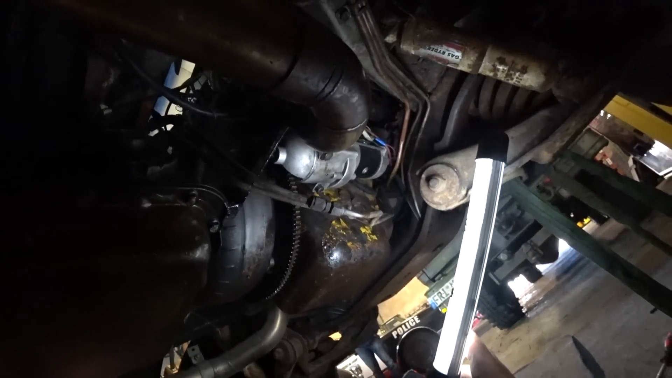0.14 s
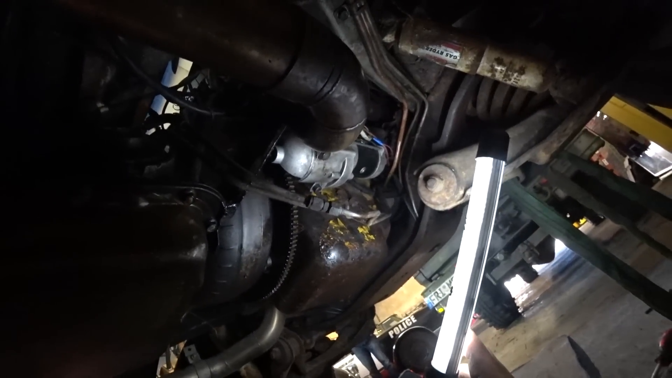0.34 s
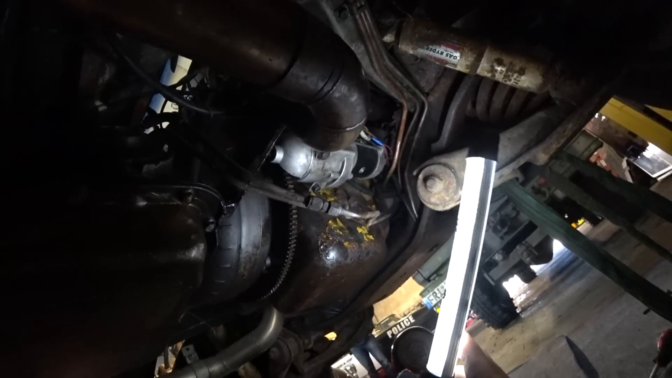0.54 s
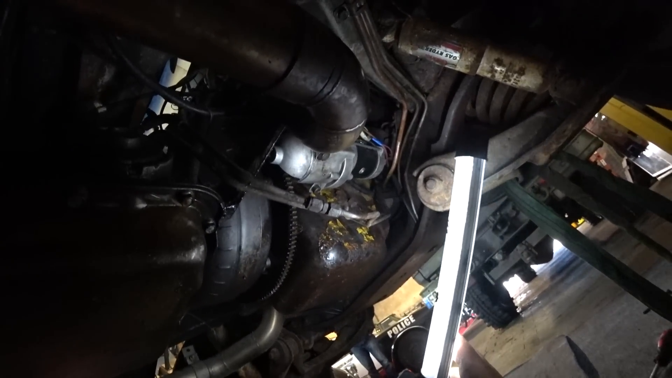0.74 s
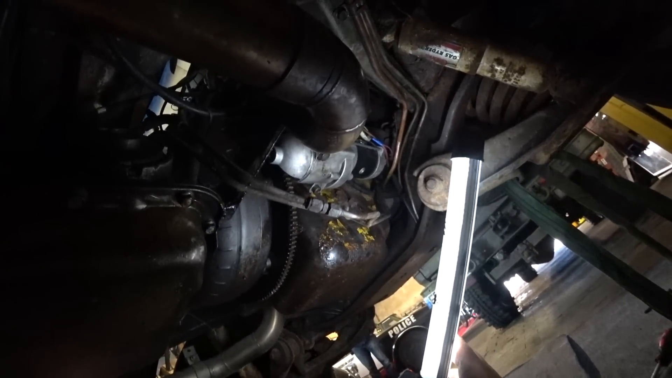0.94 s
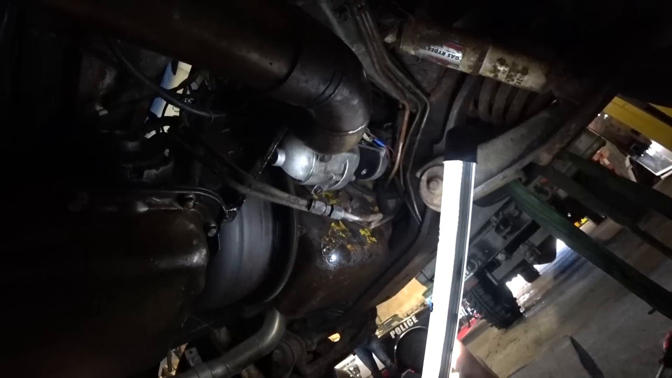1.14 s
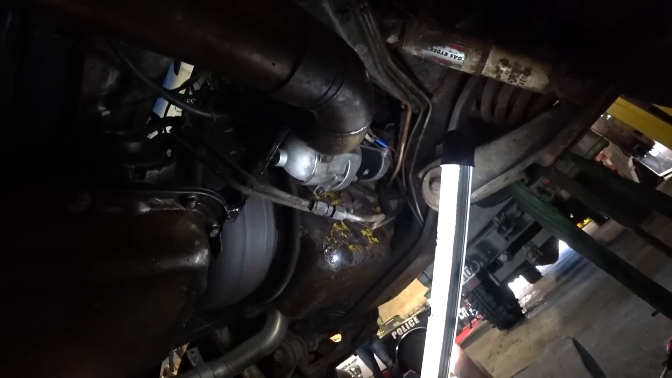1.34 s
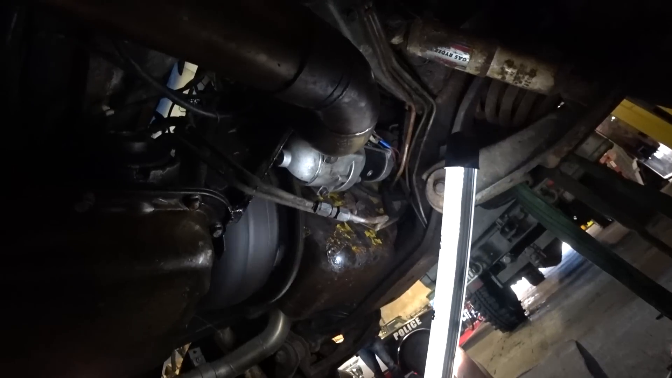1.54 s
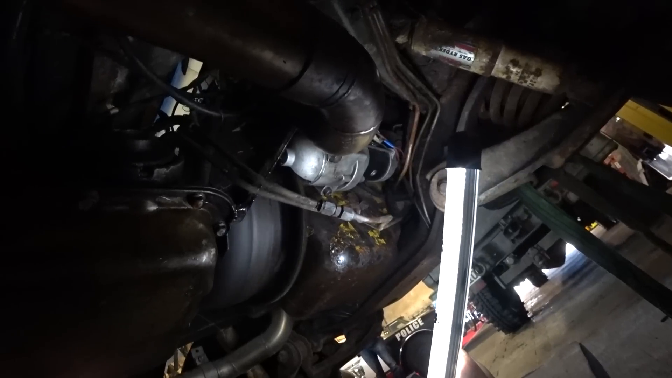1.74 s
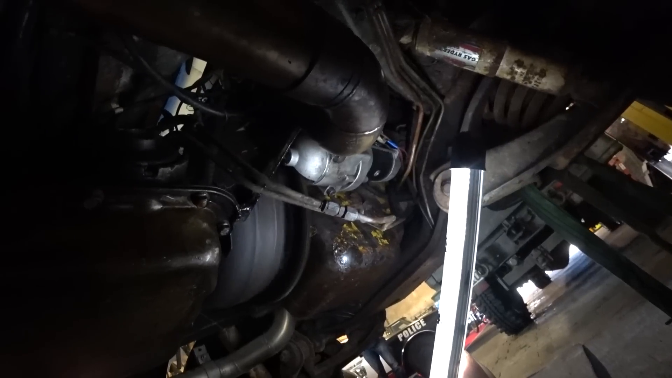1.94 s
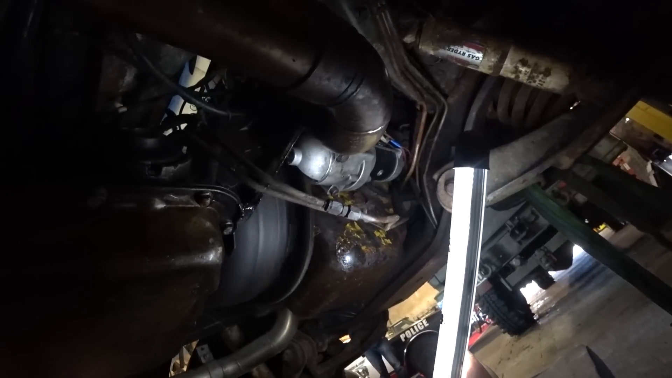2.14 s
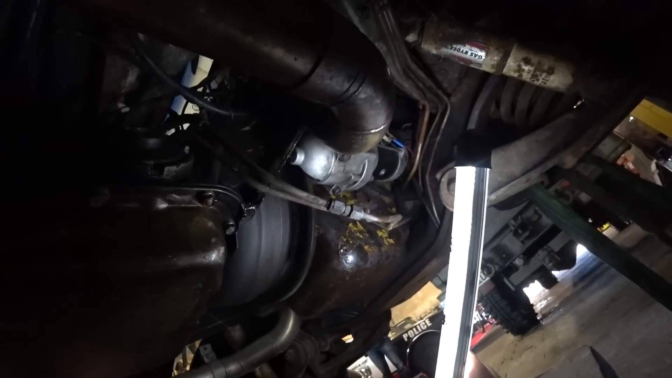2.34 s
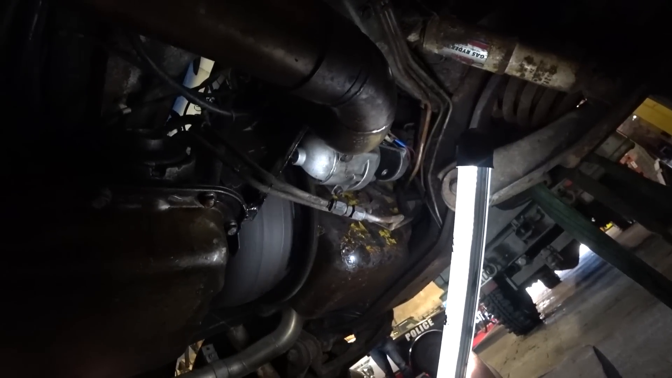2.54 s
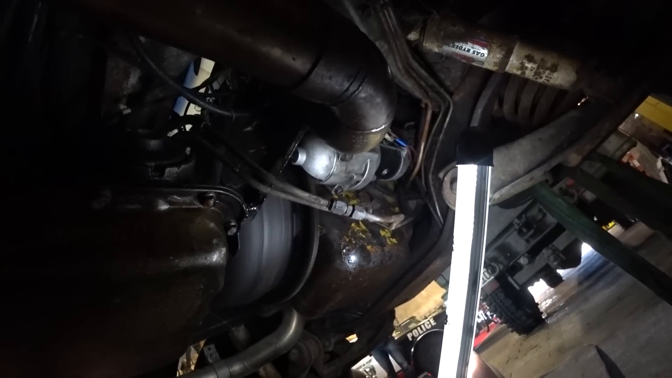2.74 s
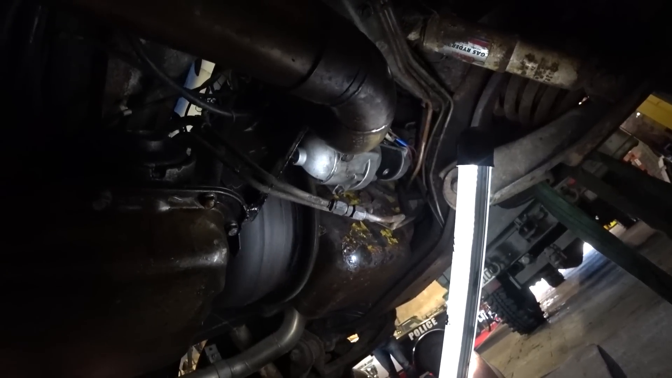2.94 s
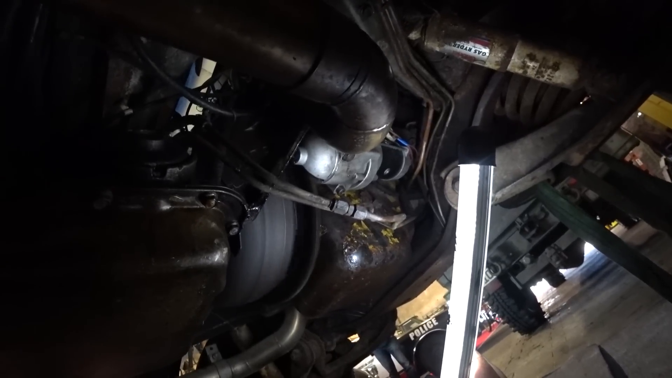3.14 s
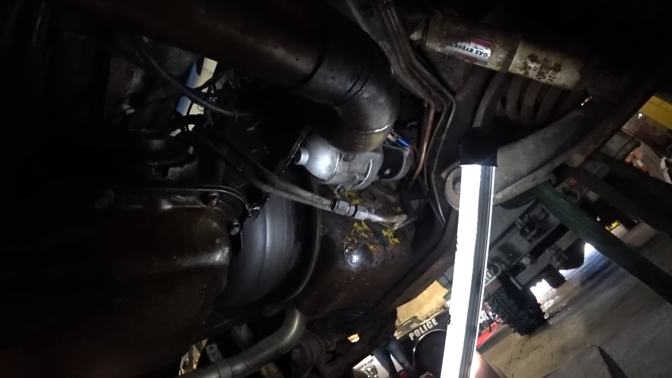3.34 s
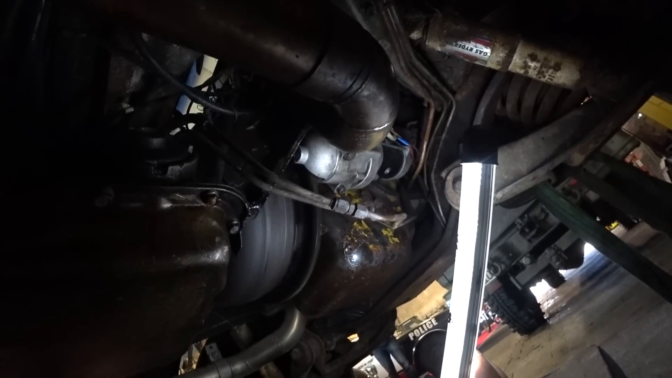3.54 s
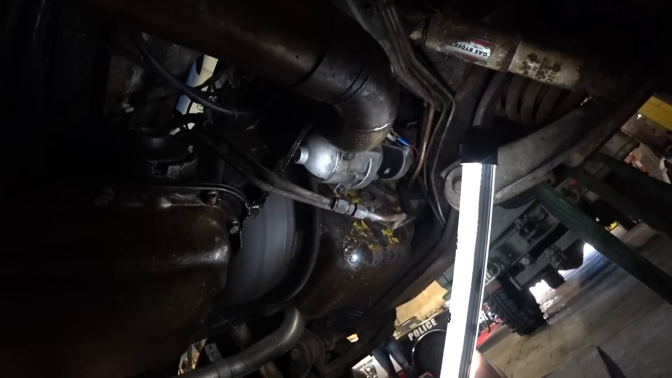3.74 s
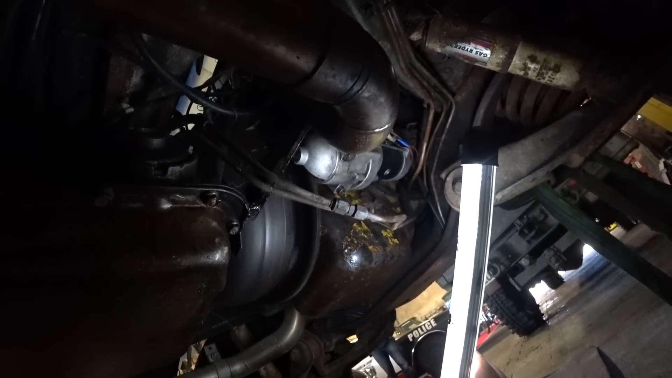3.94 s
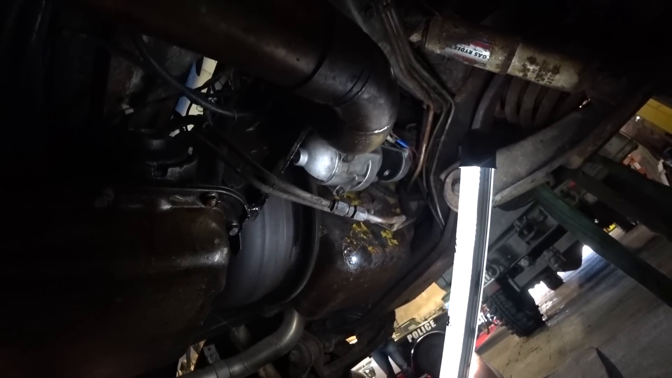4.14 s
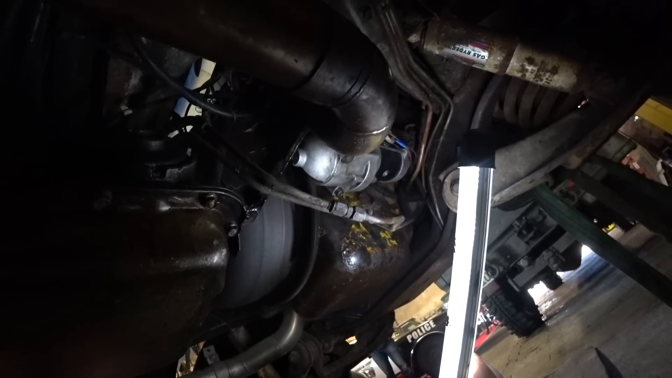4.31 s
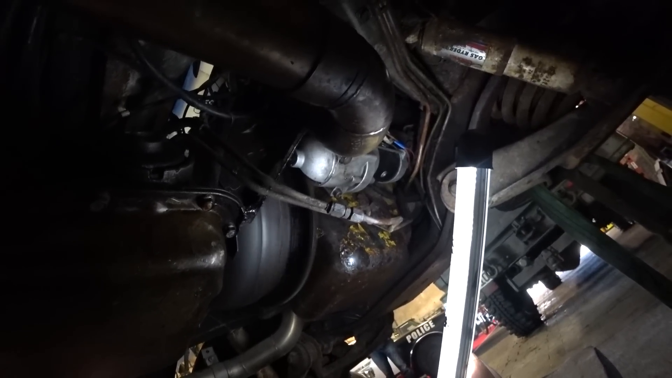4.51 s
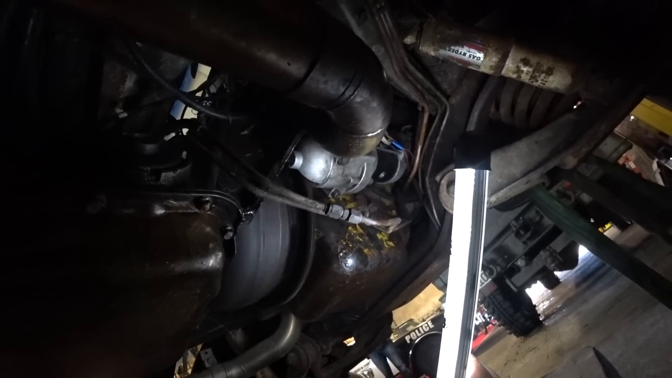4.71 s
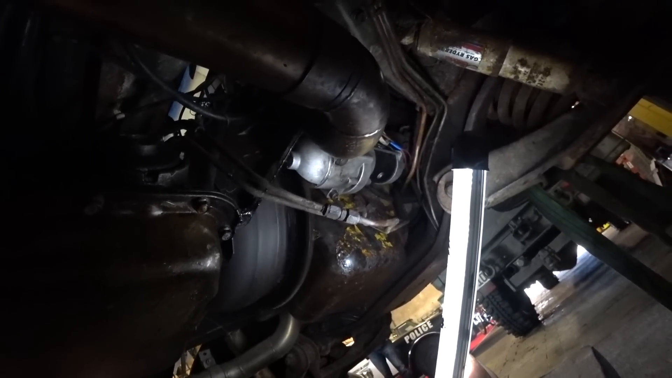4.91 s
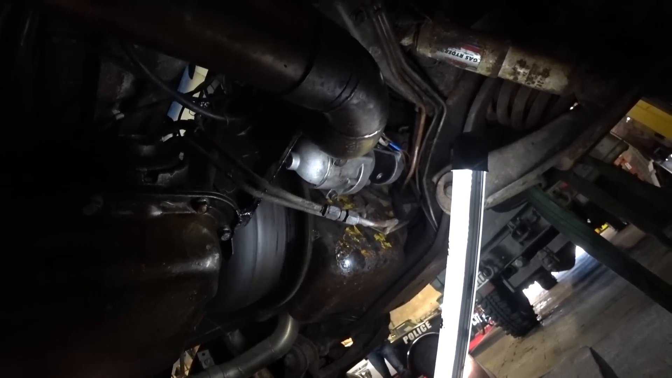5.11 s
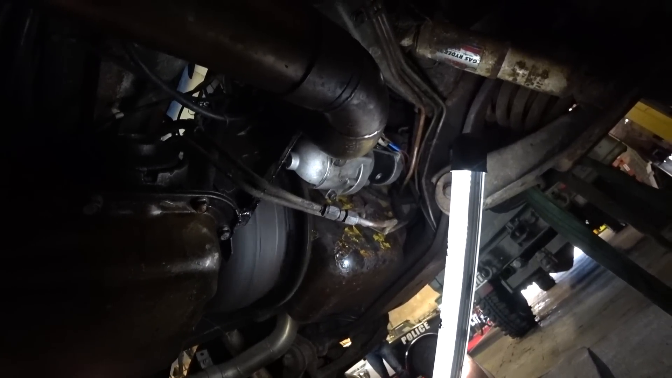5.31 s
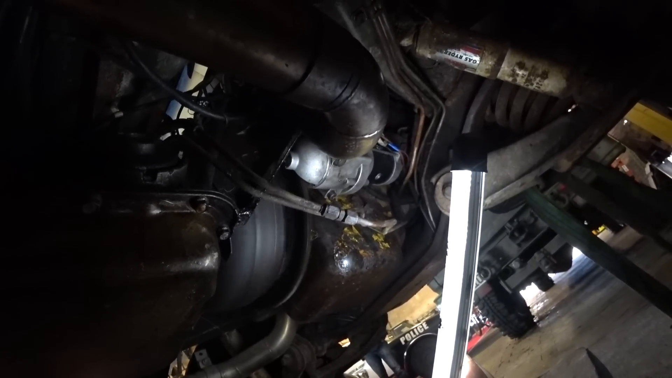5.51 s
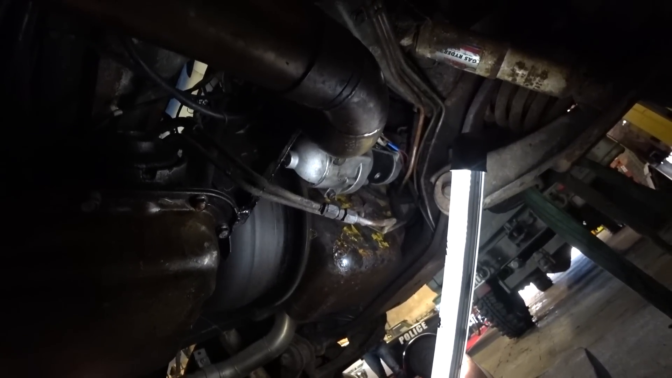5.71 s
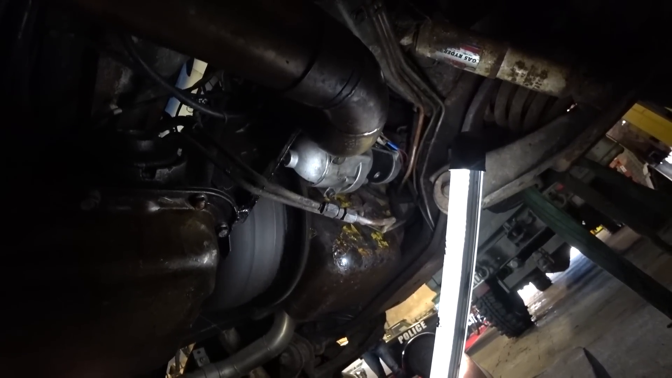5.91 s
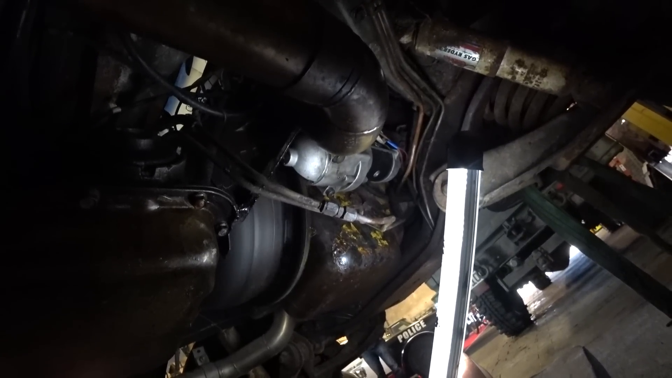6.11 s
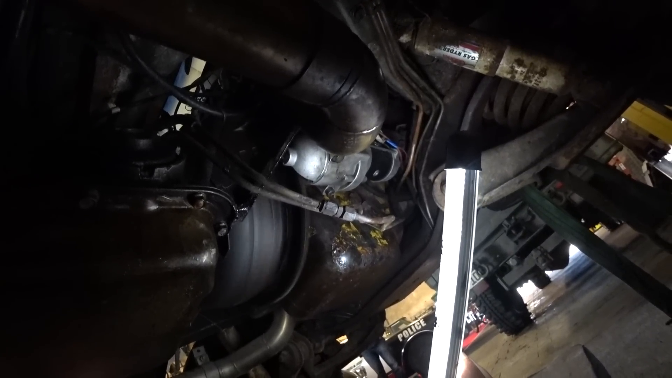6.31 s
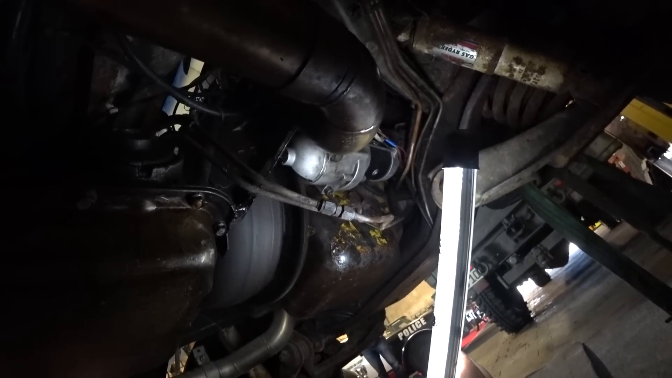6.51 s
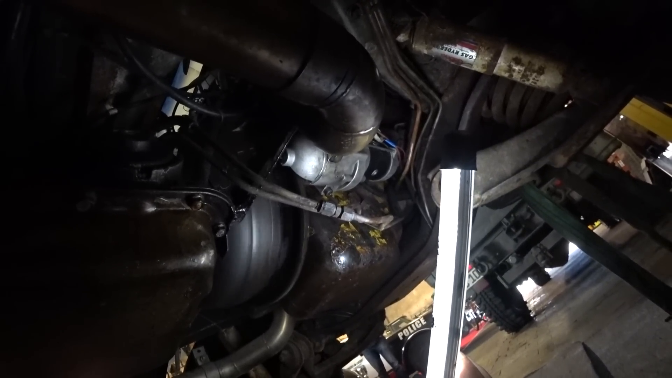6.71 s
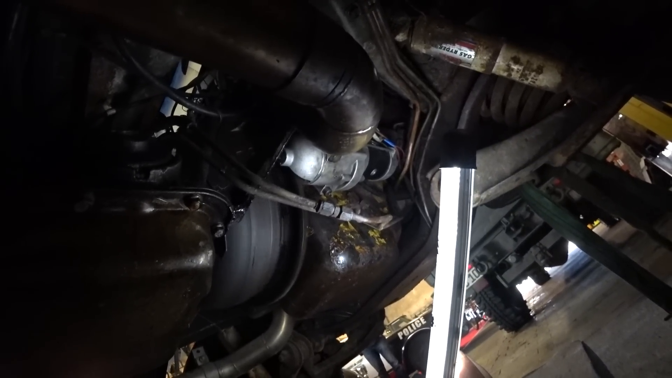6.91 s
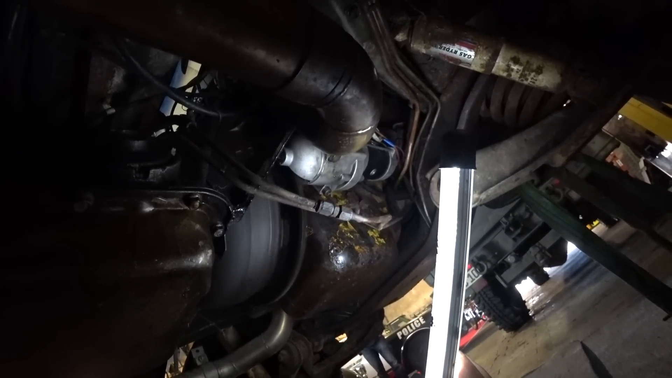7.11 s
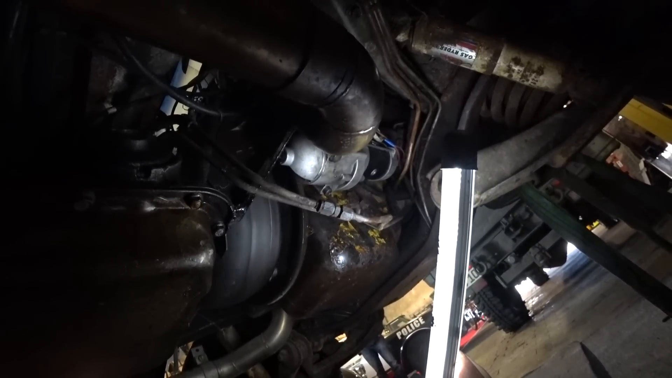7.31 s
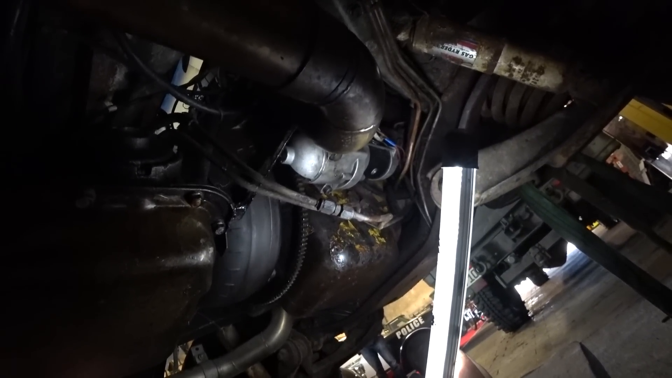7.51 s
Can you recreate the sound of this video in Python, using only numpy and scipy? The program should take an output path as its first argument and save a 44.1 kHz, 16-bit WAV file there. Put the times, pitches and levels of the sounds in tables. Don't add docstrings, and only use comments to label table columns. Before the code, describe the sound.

Close beside a diesel engine in a quiet workshop, faint hiss, a distant scrape and small metal ticks come first. A relay clicks, a solenoid clunks hard, and the starter grinds with bright, ringing gear clatter, pulsing as compressions slow it. The engine never fires. Power cuts abruptly, leaving loose clacks, a thin hum and a last solenoid snap.

```python
import sys
import numpy as np
from scipy import signal
from scipy.fft import rfft, irfft, next_fast_len
from scipy.io import wavfile
from scipy.ndimage import uniform_filter1d

SR = 44100
rng = np.random.default_rng(int(sys.argv[2]) if len(sys.argv) > 2 else 0)


def rack_gain(trim_db):
    fader = np.asarray(trim_db, float)
    return 10 ** (fader / 20)


def inscribe(sig):
    pcm = np.round(np.clip(np.atleast_2d(sig).T, -1, 1) * 32767)
    wavfile.write(sys.argv[1], SR, pcm.astype(np.int16))


N = 337806
ENGAGE_S, CUT_S = 1.04, 7.235


def evened(x):
    return x / np.sqrt(np.mean(x ** 2) + 1e-20)


def read(points, hz):
    f, value = np.transpose(points)
    return np.interp(np.log(hz + 1), np.log(f + 1), value)


def along(rows):
    s, *columns = np.transpose(rows)
    return [np.interp(np.arange(N) / SR, s, c) for c in columns]


def shape(x, db_at):
    size = next_fast_len(N + 4096)
    gain = rack_gain(db_at(np.fft.rfftfreq(size, 1 / SR)))
    return irfft(rfft(x, size) * gain, size)[..., :N]


def band(x, lo_hz, hi_hz):
    sos = signal.butter(4, [lo_hz, hi_hz], "band", fs=SR, output="sos")
    return evened(signal.sosfilt(sos, x))


def resonate(x, hz, width):
    r = np.exp(-np.pi * width / SR)
    return evened(signal.lfilter([1, 0, -1], [1, -2 * r * np.cos(2 * np.pi * hz / SR), r * r], x))


def slow(hz):
    sos = signal.butter(2, hz, fs=SR, output="sos")
    return evened(signal.sosfilt(sos, rng.standard_normal(N)))


def between(start_s, end_s, rise_s, fall_s):
    t = np.arange(N) / SR
    return np.clip((t - start_s) / rise_s, 0, 1) * np.clip((end_s - t) / fall_s, 0, 1)


# pitch in Hz, level in dB per Hz.
ROOM_COLOUR = [(12, -37), (20, -6), (109, -9.5), (128, -9), (154, -15), (547, -23), (930, -21.5),
               (1120, -21), (1800, -26.5), (1950, -23), (2230, -33), (2750, -31), (6090, -37), (7140, -34),
               (11200, -45), (14600, -77), (22000, -120)]
# pitch in Hz, width in Hz, level in dB.
SCRAPE_TONES = [(346, 100, 4.5), (565, 65, 4), (720, 130, 4), (900, 170, -7), (1170, 44, 7.5),
                (1530, 120, -19), (3150, 140, -13)]
# time in seconds, level in dB.
SCRAPE_FADE = [(0.0, -57), (0.01, -53.5), (0.096, -56), (0.112, -53), (0.274, -63.5), (0.292, -76),
               (0.33, -76)]
# pitch in Hz, width in Hz, level in dB.
FAN_WHINE = [(1940, 25, -84.5)]


def shop():
    centre, apart, drag = rng.standard_normal((3, N))
    apart = shape(apart, lambda hz: 1.2 * np.log2(hz / 9000 + .01))
    both = np.array([centre, centre]) + np.outer([1, -1], apart)
    air = evened(shape(both, lambda hz: read(ROOM_COLOUR, hz)))
    scrape = np.zeros(N)
    for hz, width, db in SCRAPE_TONES:
        tone = resonate(resonate(drag, hz, 1.3 * width), hz, 2.5 * width)
        scrape += rack_gain(db) * np.sqrt(width) * tone
    dragging = np.arange(N) < SCRAPE_FADE[-1][0] * SR
    scrape = dragging * rack_gain(along(SCRAPE_FADE)[0]) * evened(scrape)
    fan = sum(rack_gain(db) * resonate(centre, hz, width) for hz, width, db in FAN_WHINE)
    return rack_gain(-61) * air + scrape + fan


# start in seconds, peak in dB, pitch in Hz, time to fade by 60 dB in seconds.
METAL_TICKS = [
    (.387, -47, 5000, 0.049),
    (.387, -51, 7750, 0.086),
    (.388, -46, 9600, 0.05),
    (.552, -58, 2850, .03),
    (.63, -51, 4940, 0.042),
    (.631, -62, 7880, .05),
    (.857, -42, 5000, 0.045),
    (.858, -58, 9100, .06),
    (.746, -41, 3160, .006),
    (7.452, -48, 4100, .05),
]


def ticks():
    out, t = np.zeros(N), np.arange(3000) / SR
    for s, db, hz, t60 in METAL_TICKS:
        click = 0.19 * np.diff(rng.standard_normal(len(t) + 1)) * np.exp(-t / .003)
        ping = resonate(rng.standard_normal(len(t)), hz, 90.) * rack_gain(-60 * t / t60)
        ping *= 0.62 * (1 - np.exp(-t / .002))
        out[round(s * SR):][:len(t)] += rack_gain(db) * (ping + click)
    return out


def clacks(rows, modes, rise_s, thud):
    out, t = np.zeros(N), np.arange(9000) / SR
    for s, db, lo_hz, hi_hz, t60, ring_db in rows:
        noise = rng.standard_normal(len(t))
        snap = 0.29 * np.diff(noise, prepend=0) * np.exp(-t / 0.019)
        crack = (band(noise, lo_hz, min(hi_hz, 11000)) + snap) * rack_gain(-60 * (t / t60) ** 1.16)
        ring = sum(rack_gain(d - 60 * t / fade) * resonate(noise, hz, 98.0) for hz, d, fade in modes)
        body = thud * band(noise, 208, 1020) * rack_gain(-60 * t / 0.34)
        blow = (crack + body + rack_gain(ring_db) * ring) * (1 - np.exp(-t / rise_s))
        part = out[round(s * SR):][:len(t)]
        part += (rack_gain(db) * blow / abs(blow).max())[:len(part)]
    return out


# start in seconds, peak in dB, low edge in Hz, high edge in Hz,
# time to fade by 60 dB in seconds, share of ringing in dB.
ENGAGE_CLACKS = [
    (.792, -14.5, 990, 7060, 0.066, -5),
    (1.02, -5.5, 530, 9700, 0.058, -22),
    (1.047, -15, 630, 1110, 0.094, -32),
]
# pitch in Hz, level in dB, time to fade by 60 dB in seconds.
RELAY_RING = [(1150, 2, 0.15), (1640, -11, 0.13), (2310, -7, 0.16), (2900, 8, 0.058), (3050, -15, 0.35),
              (3350, -5, .07), (4560, 5.5, 0.042), (5550, 0, 0.04)]


def relay_and_solenoid():
    return clacks(ENGAGE_CLACKS, RELAY_RING, rise_s=0.0023, thud=0.11)


# start in seconds, tone level in dB,
# pitch in Hz, length in seconds, rumble in dB relative to the tone.
CASE_GROANS = [
    (1.026, -27.5, 530, 0.044, 2),
    (1.619, -40.5, 530, 0.095, 2),
    (2.389, -45, 523, 0.057, 8),
    (2.749, -35, 525, 0.094, -6),
    (3.892, -29, 530, 0.1, -3),
    (4.671, -42, 530, 0.071, -4),
    (5.017, -33, 552, 0.095, 0),
    (5.799, -49, 530, 0.064, 10.5),
    (6.129, -31, 530, 0.099, -1),
    (7.193, -39.5, 530, 0.071, 9.5),
]


def groans():
    out, rumble = np.zeros(N), band(rng.standard_normal(N), 500, 1680)
    for s, db, hz, length, rumble_db in CASE_GROANS:
        t = np.arange(round(length * SR)) / SR
        part = slice(round(s * SR), round(s * SR) + len(t))
        tone = np.sqrt(2) * np.sin(2 * np.pi * hz * t)
        swell = np.sin(np.pi * t / length) ** 1.66
        out[part] += rack_gain(db) * swell * (tone + rack_gain(rumble_db) * rumble[part])
    return out


# start in seconds, pace of the starter (1 = full), extra stall as a share.
ENGINE_CYCLES = [
    (.55, 1.05, .1),
    (1.631, .98, .09),
    (2.785, .98, .02),
    (3.925, .975, .01),
    (5.059, 1.005, -.02),
    (6.185, 1.0, 0),
    (7.31, 1.01, 0),
]


def cycle_place():
    s = np.transpose(ENGINE_CYCLES)[0]
    return np.interp(np.arange(N) / SR, s, np.arange(len(s))) % 1


# place as a share of the cycle, tooth rate in Hz.
STROKE_RATES = [(0, 182), (.092, 253.4), (.186, 260.8), (.252, 216), (.31, 256.1), (.496, 304),
                (.633, 286.4), (.7, 228), (.77, 247), (.84, 215.1), (.905, 236)]


def stroke_rate():
    at, hz = np.transpose(STROKE_RATES)
    return np.interp(cycle_place(), at, hz, period=1)


def strain():
    hz = np.transpose(STROKE_RATES)[1]
    return (hz.max() - stroke_rate()) / np.ptp(hz)


def teeth():
    pace, stall = along(ENGINE_CYCLES)
    since = np.maximum(np.arange(N) / SR - ENGAGE_S, 0)
    spin_up = 1 - .37 * np.exp(-since / .15)
    return stroke_rate() * pace * (1 - stall * strain() ** 3) * spin_up


# pitch in Hz, level in dB per Hz.
HOUSING_COLOUR = [(88, -40), (150, -16), (250, -17), (400, -14.5), (620, -20.5), (1000, -9), (1400, -11),
                  (1900, -6.5), (2600, -2.5), (3300, 1.5), (5200, -3), (6300, -8), (7800, -13),
                  (11200, -10)]
# pitch in Hz,
# width in Hz, boost in dB.
HOUSING_RINGS = [(243, 40, 4.5), (530, 23, 13.5), (700, 140, 14.5), (769, 14, 11), (893, 40, 2.5),
                 (1190, 80, 1.5), (1563, 120, 5.5), (1776, 100, 8.5), (1963, 230, 4.5), (2235, 85, 8.5),
                 (2548, 70, 14), (3000, 50, 6), (3186, 85, 8), (3585, 69, 8), (4160, 97, 7.5),
                 (4583, 107, 10.5), (5225, 410, 5.5), (5590, 240, 6.5), (7014, 85, 8), (8400, 270, 7.5)]


def housing(ring_share, shift):
    hz = np.fft.rfftfreq(8192, 1 / SR)
    peaks = 0
    for f, width, boost in HOUSING_RINGS:
        centre = f * (shift if f > 1300 else 1)
        peaks = peaks + boost / (1 + (2 * (hz - centre) / width) ** 2)
    db = read(HOUSING_COLOUR, hz) + ring_share * peaks
    log_gain = np.log(rack_gain(np.maximum(db, -80)))
    full = np.concatenate([log_gain, log_gain[-2:0:-1]])
    return np.fft.ifft(np.exp(np.conj(signal.hilbert(full)))).real[:4096]


def wheel(blows):
    t = np.arange(900) / SR
    paths = rfft(rng.standard_normal((2, len(t))) * np.exp(-t / 0.0079))
    paths = irfft(paths / abs(paths) ** 0.77, len(t))
    angle = 1.406 * slow(9.16)
    out = np.zeros(N)
    for path, detune, mix in zip(paths, (-0.019, 0.019), (np.cos(angle), np.sin(angle))):
        ring = np.convolve(path / np.linalg.norm(path), housing(1, 1 + detune))
        out += signal.oaconvolve(mix * blows, ring)[:N]
    return out


def clumps(x, db):
    hz, _, z = signal.stft(x, SR, nperseg=256)
    patches = uniform_filter1d(rng.standard_normal(z.T.shape), size=7, axis=0)
    patches = evened(uniform_filter1d(patches, size=4, axis=1))
    depth = db * np.clip(hz / 2500, .7, 1)[:, None]
    return signal.istft(z * rack_gain(depth * patches.T), nperseg=256)[1][:N]


def gear():
    jitter_s, scatter_db, wobble = .00003, 2.5, .009
    speed = uniform_filter1d(teeth(), size=900) * (1 + wobble * slow(25.))
    turns = np.cumsum(speed) / SR
    at = np.flatnonzero(np.diff(np.floor(turns)))
    luck = rng.standard_normal((len(at), 2))
    at = np.clip(at + np.round(jitter_s * SR * luck[:, 0]).astype(int), 0, N)
    blows = np.zeros(N + 1)
    np.add.at(blows, at, rack_gain(scatter_db * luck[:, 1]))
    grinding = (1 + 0.37 * np.cos(2 * np.pi * turns)) * rng.standard_normal(N)
    grinding = shape(grinding, lambda hz: 1.2 * np.log2(np.clip(hz, 150, 4500) / 2000))
    ground = signal.oaconvolve(grinding, housing(0.69, 0.92))[:N]
    return clumps(wheel(evened(blows[:N])) + 0.47 * ground, db=2.0)


def bumps(rows):
    place = cycle_place()
    return sum(db * np.exp(-(((place - at + .5) % 1 - .5) / width) ** 2) for at, width, db in rows)


# place as a share of the cycle, width as a share, top rattle in dB.
TOOTH_SNAPS = [
    (.075, .02, 3),
    (.55, .012, 0.5),
    (.62, .03, 1.5),
    (.962, .015, 2.5),
]
# place as a share of the cycle, width as a share, level in dB.
BLOCK_KICKS = [
    (.21, .04, 6),
    (.49, .03, 6),
    (.68, .03, 7),
    (.97, .035, 9),
]


def starter():
    t, load = np.arange(N) / SR, strain()
    clatter_db = -16.5 - load ** 5.04 - 850 * np.maximum(t - CUT_S, 0)
    low_db = -18.5 + 3 * load + 2.5 * slow(16.0)
    top_cut_db = 246 * np.clip(t - CUT_S + 0.024, 0, .1)
    top_db = -10 - 3 * load + bumps(TOOTH_SNAPS) - top_cut_db
    top_db = top_db + 1.9 * slow(28.0)
    ring = gear()
    ring = ring / np.sqrt(uniform_filter1d(ring ** 2, size=5000) + 1e-12)
    middle = band(ring, 1140, 7480)
    low = rack_gain(low_db) * band(ring, 165, 1682)
    top = rack_gain(top_db) * band(ring, 6560, 10920)
    shudder_db = -64.5 + bumps(BLOCK_KICKS) + 3.2 * slow(12.0)
    shudder = rack_gain(shudder_db) * band(rng.standard_normal(N), 50, 212)
    running = between(ENGAGE_S, 7.29, 0.011, .02)
    return running * (rack_gain(clatter_db) * (middle + low + top) + shudder) + groans()


# pitch in Hz, width in Hz, level in dB.
COAST_TONES = [(400, 14, -65), (765, 8.9, -50.5), (1510, 17, -65)]


def coast():
    noise, since = rng.standard_normal(N), np.arange(N) / SR - CUT_S
    tones = sum(rack_gain(db) * resonate(noise, hz, width) for hz, width, db in COAST_TONES)
    fade = rack_gain(-42 * np.maximum(since, 0))
    return np.clip(since / 0.018, 0, 1) * fade * tones


# time in seconds, scrape in dB, block thud in dB relative to the scrape.
ROCK_LEVELS = [
    (7.25, -45, -4),
    (7.372, -42.5, -5),
    (7.424, -51.5, -2),
    (7.478, -54.5, -10),
    (7.5, -70, 5),
    (7.56, -69, -9),
]
# pitch in Hz, level in dB per Hz.
ROCK_COLOUR = [(150, -29), (250, -12), (600, -11), (780, -7), (950, -18), (1400, -11), (1520, -17),
               (1700, -13), (3500, -17), (5000, -32), (11000, -38)]


def rock_back():
    scrape_db, thud_db = along(ROCK_LEVELS)
    rough, low = rng.standard_normal((2, N))
    scrape = evened(shape(rough * rack_gain(2.0 * slow(61.4)), lambda hz: read(ROCK_COLOUR, hz)))
    thud = rack_gain(thud_db) * band(low, 55, 310)
    gate = between(ROCK_LEVELS[0][0], ROCK_LEVELS[-1][0], 0.011, 0.014)
    return gate * rack_gain(scrape_db) * (scrape + thud)


# start in seconds, peak in dB, low edge in Hz, high edge in Hz,
# time to fade by 60 dB in seconds, share of ringing in dB.
PINION_KNOCKS = [
    (7.317, -26, 700, 6950, 0.024, -1),
    (7.349, -22, 500, 6950, .03, -4),
    (7.381, -22.5, 2900, 5770, 0.046, -19),
]
# pitch in Hz, level in dB, time to fade by 60 dB in seconds.
PINION_RING = [(250, 0, 0.046), (1205, 5, .04), (2080, 0, 0.034), (3200, -3, 0.044)]


def pinion_knocks():
    return clacks(PINION_KNOCKS, PINION_RING, rise_s=.0006, thud=0.052)


# start in seconds, peak in dB, low edge in Hz, high edge in Hz,
# time to fade by 60 dB in seconds, share of ringing in dB.
SOLENOID_DROP = [
    (7.496, -16, 1240, 5900, 0.062, -6.5),
]
# pitch in Hz, level in dB, time to fade by 60 dB in seconds.
PLUNGER_RING = [(1580, -3, 0.1), (2120, -6, 0.1), (2900, -2, 0.072), (3490, 7, .05), (4600, -2, .05)]


def solenoid_release():
    return clacks(SOLENOID_DROP, PLUNGER_RING, rise_s=.0008, thud=0.081)


def tail(t60, gap_s):
    t = np.arange(round(.6 * SR)) / SR
    echo = rng.standard_normal((2, len(t))) * rack_gain(-60 * t / t60) * (t > gap_s)
    return echo / np.linalg.norm(echo[0])


# pitch in Hz, side level relative to the middle in dB.
SIDE_SPREAD = [(60, -23), (120, -19), (220, -19.5), (430, -12.5), (840, -15), (1620, -14), (3140, -23),
               (6080, -18), (11800, -8.5)]
# pitch in Hz, level in dB.
HALL_COLOUR = [(100, -24), (600, 0.5), (3000, -5.5), (5000, -10), (11000, -11)]
# pitch in Hz, left level relative to right in dB.
SIDE_LEAN = [(60, -4), (170, 0), (500, -1.5), (1420, -0.5), (4090, -1), (11800, -3.5)]


def scene():
    mid = ticks() + relay_and_solenoid() + starter() + coast()
    mid = mid + rock_back() + pinion_knocks() + solenoid_release()
    bay = signal.fftconvolve(mid, tail(0.031, 0.0012)[0])[:N]
    apart = shape(bay, lambda hz: read(SIDE_SPREAD, hz))
    hall = signal.fftconvolve(mid[None], tail(0.51, 0.01), axes=1)[:, :N]
    hall = shape(hall, lambda hz: read(HALL_COLOUR, hz))
    near = mid + np.outer([1, -1], apart) + rack_gain(-26.5) * (hall + 1.8 * hall.mean(0))
    return shape(near, lambda hz: np.outer([.5, -.5], read(SIDE_LEAN, hz))) + shop()


def low_pass(x):
    return signal.sosfilt(signal.butter(12, 12360, fs=SR, output="sos"), x)


def record(dry):
    bent = 0.58 * np.tanh(dry / 0.52) - dry
    held = dry + signal.sosfilt(signal.butter(2, 300, "high", fs=SR, output="sos"), bent)
    edge = signal.firwin(2047, 11045, window=("kaiser", 9), fs=SR)
    edged = signal.oaconvolve(held, edge[None], "same")
    return low_pass(edged)


dry = scene()
out = record(dry)
inscribe(out)
```